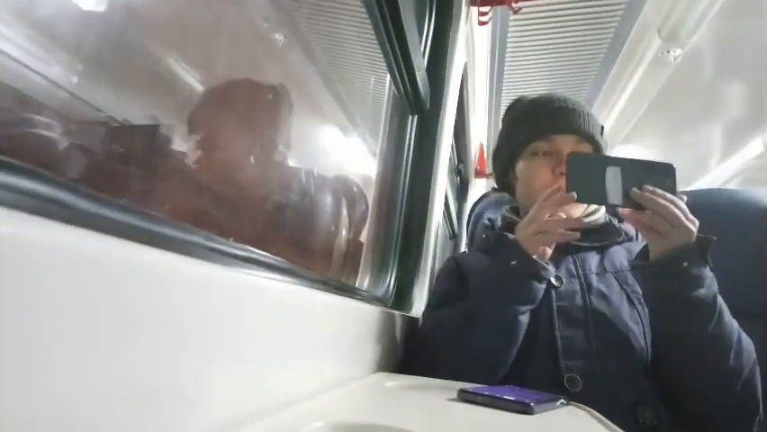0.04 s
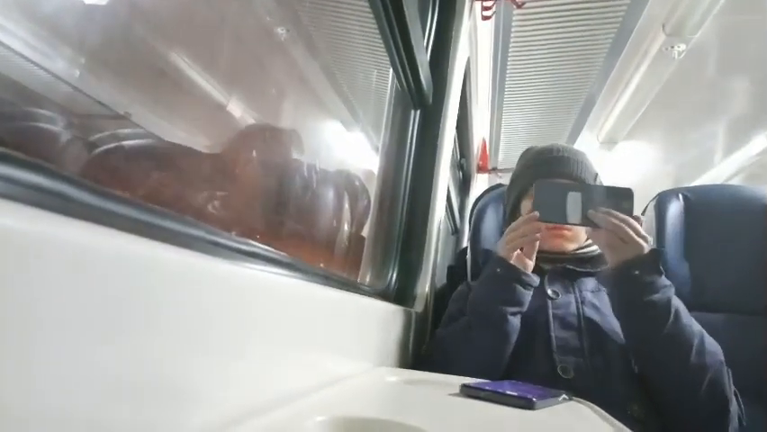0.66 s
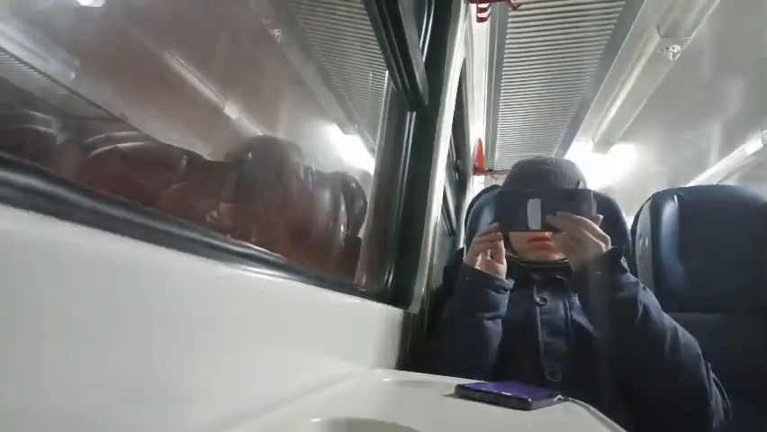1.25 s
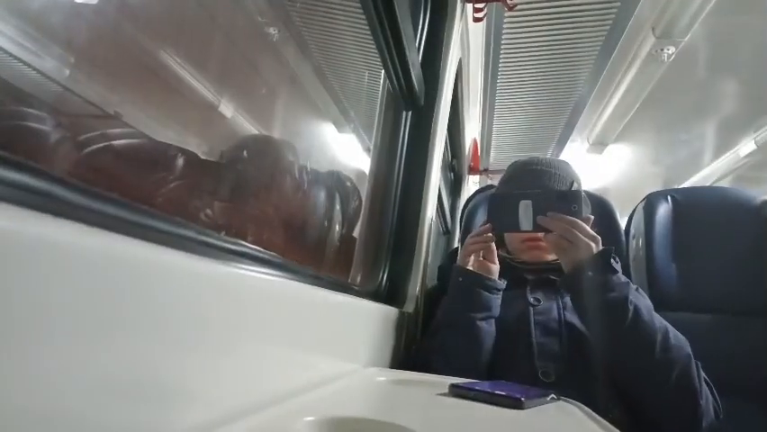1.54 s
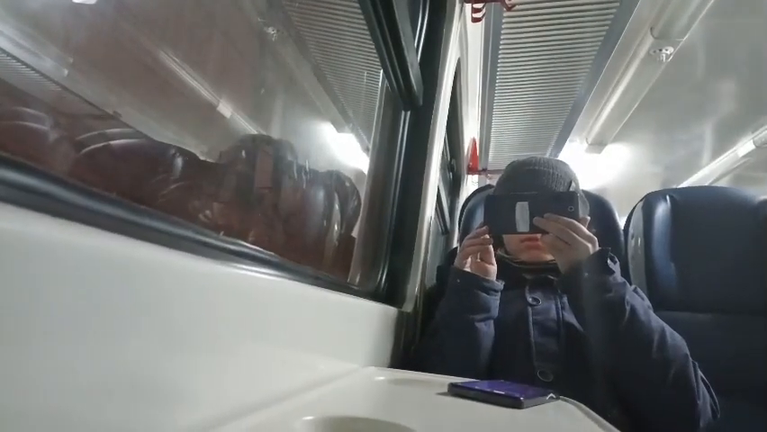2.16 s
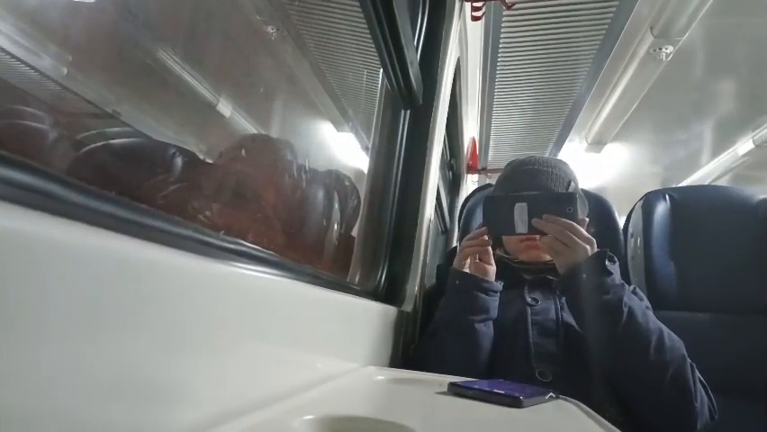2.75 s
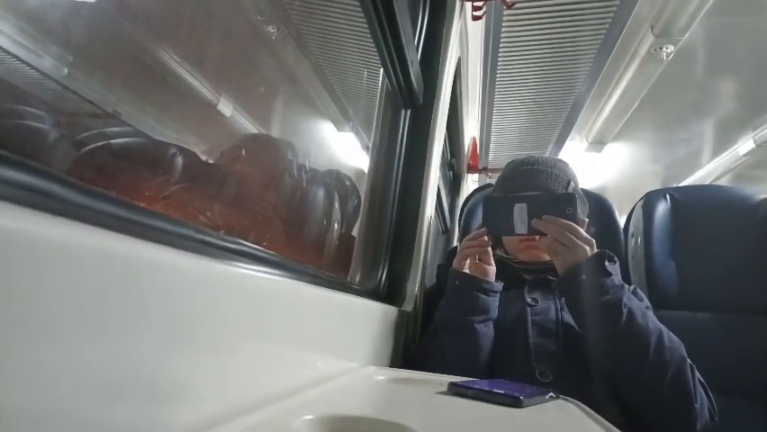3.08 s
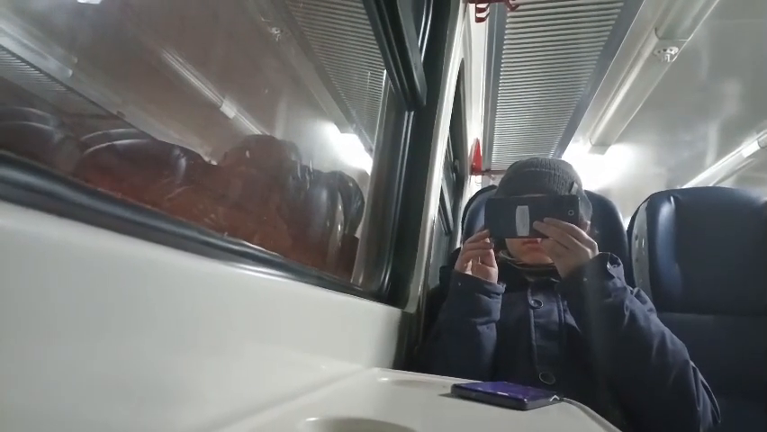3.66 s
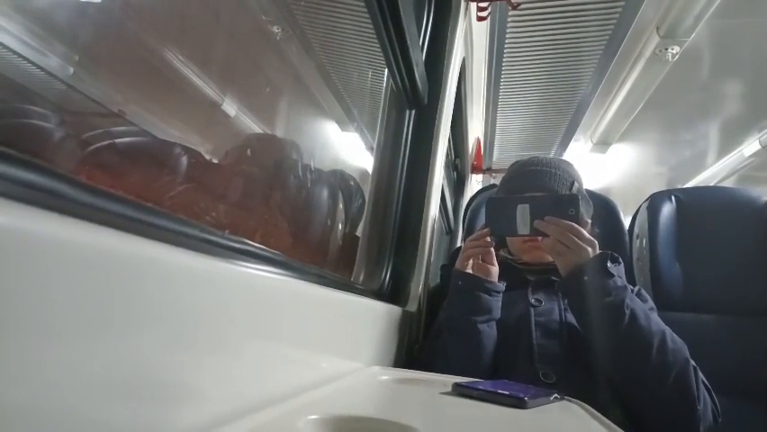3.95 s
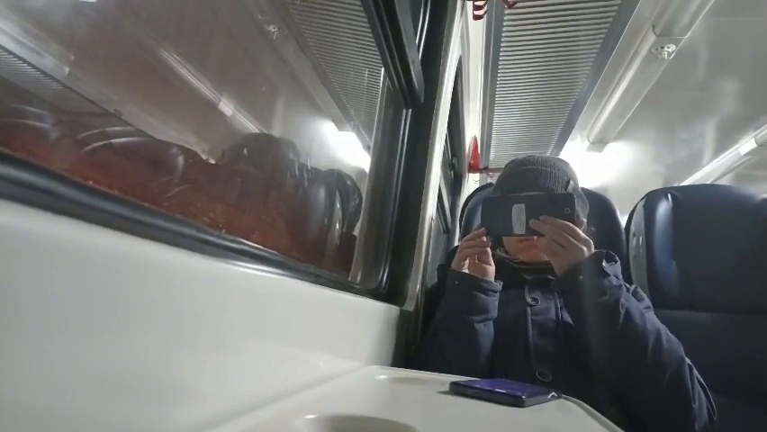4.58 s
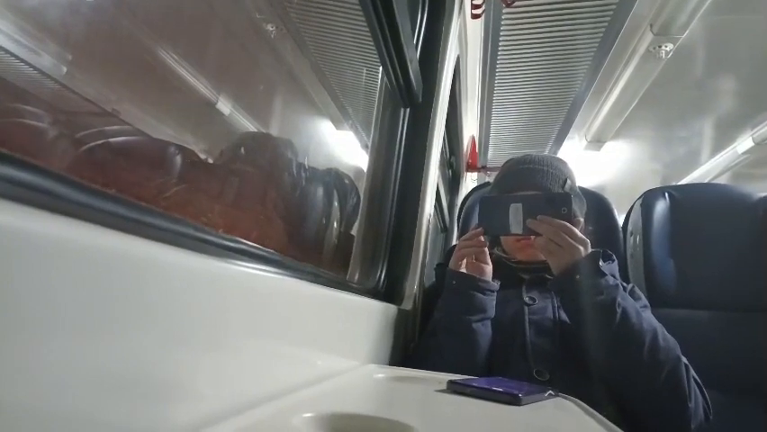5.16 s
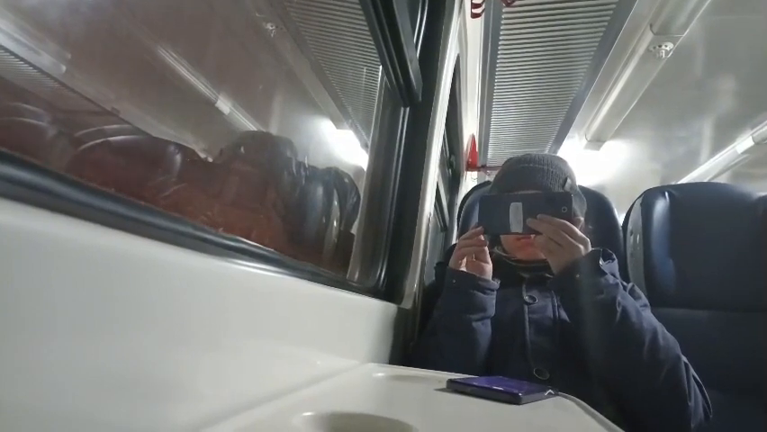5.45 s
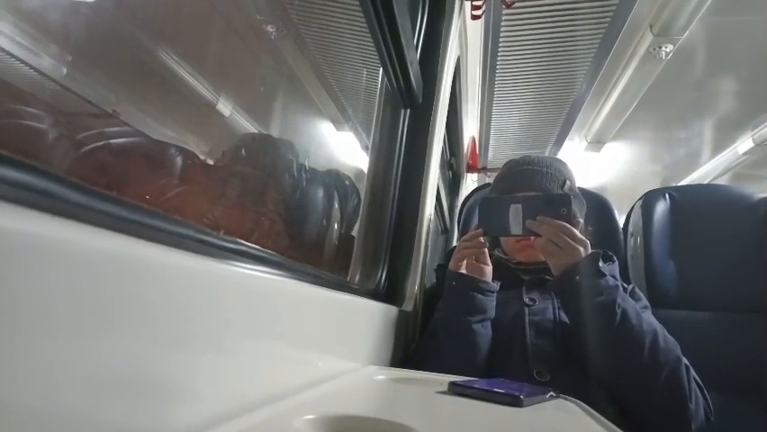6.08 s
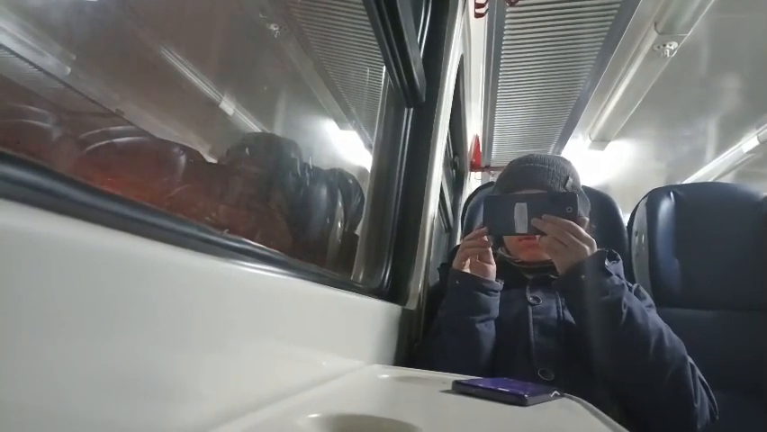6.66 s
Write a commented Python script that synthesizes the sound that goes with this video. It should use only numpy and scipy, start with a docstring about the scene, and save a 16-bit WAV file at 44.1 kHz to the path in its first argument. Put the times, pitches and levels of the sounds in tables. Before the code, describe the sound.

A moving diesel railbus rumbles from inside, with a steady whine, air hiss, and scattered thumps, knocks and metal rattles.

```python
"""Inside a moving diesel railbus. Engine and wheels force the modes of the car body into a drone,
under a rolling roar and a steady electrical whine. Jolts from the track excite free vibrations:
the floor thumps, wall panels knock and loose metal fittings rattle in the reverberant cabin.
Ventilation air hisses and resonates in its ducts, small parts tick, and a coat rustles by friction
near the microphone."""
import sys
import numpy as np
from scipy import signal
from scipy.fft import rfft, irfft, next_fast_len
from scipy.io import wavfile
from scipy.ndimage import uniform_filter1d, map_coordinates

SR = 44100
rng = np.random.default_rng(int(sys.argv[2]) if len(sys.argv) > 2 else 0)


def dump_mix(stems):
    """Bounce the given channels to the path in sys.argv[1] as a 16-bit WAV at rate SR."""
    frames = np.atleast_2d(stems).T  # one column per channel
    limited = np.clip(frames, -1, 1)  # hard clip at full scale
    pcm = np.round(limited * 32767).astype(np.int16)
    wavfile.write(sys.argv[1], SR, pcm)


N = 301203

# Coherence of the diffuse field between left and right: f/Hz, coherence
COHERENCE = [(60, 0.95), (130, 1), (290, 0.76), (640, 0.06), (1400, 0.04), (15000, .02)]
# Reverberation time of the cabin: f/Hz, T60/s
REVERBERATION = [(200, 0.56), (1000, 0.37), (2500, 0.36), (9000, 0.42)]
# Response of the microphone ports: f/Hz, left minus right/dB
PORT_BALANCE = [(60, -0.9), (200, 2), (400, 1.3), (800, -0.5), (1300, -2), (2300, -2.5), (4400, -6.5),
                (6500, -9.5), (8000, -13), (10000, -2.5), (12000, 7.5), (15000, 2)]
# Spectra of vent air, sliding cloth, fittings, panels, low rumble and rolling roar: f/Hz, level/dB
HISS_SPECTRUM = [(650, -31), (1100, -4.5), (1500, -4.5), (1770, -1.5), (2160, -6), (2330, -2.5),
                 (2570, -14), (2660, -8.5), (2940, -7.5), (4090, -15), (5690, -20.5), (8560, -29.5),
                 (12200, -26.5), (15400, -29)]
CLOTH_SPECTRUM = [(800, -21), (2000, -8), (3500, 5.5), (5000, -2), (6700, 4.5), (8000, -3.5), (10500, -3.5),
                  (11400, -5.5), (12000, 1), (15300, -11.5)]
FITTING_SPECTRUM = [(410, -14.5), (700, -1), (842, -12), (1000, -17), (1140, -5.5), (1400, -7.5),
                    (1860, -0.5), (2150, -6.5), (2430, -4), (2700, -11.5), (2950, -8), (3200, -13.5),
                    (3560, -11), (4370, -19), (5380, -23), (5840, -26), (8150, -31), (11000, -57.5),
                    (14300, -84), (22000, -120)]
PANEL_SPECTRUM = [(150, -30.5), (250, -1.5), (350, 4.5), (470, 1.5), (570, 4.5), (760, 1), (1000, -2),
                  (1250, -4), (1500, -8.5), (2200, -15.5), (3000, -24), (6000, -42.5), (15000, -69)]
RUMBLE_SPECTRUM = [(12, -53), (20, -57), (24, -38), (29, -43), (49, -22), (74, -1), (86, -16.5),
                   (102, -8.5), (125, 0.5), (173, 3.5), (195, -29), (283, -15), (330, -18.5), (430, -65),
                   (730, -120)]
ROAR_SPECTRUM = [(150, -2.5), (250, 7.5), (330, -0.5), (450, -1.5), (600, -6), (800, -10.5), (1100, -15.5),
                 (1500, -27), (2500, -39.5)]
# Air duct resonances, for each of two filter passes: f/Hz, bandwidth/Hz, level/dB
DUCT_MODES = [(1727, 28, 2), (1897, 50, -4), (2292, 46, -2), (2866, 35, -5), (3000, 27, -3),
              (3600, 130, -8.5), (3860, 53, -7.5), (4400, 34, -10)]
# Strength of the singing in the ducts: t/s, level/dB
DUCT_ENVELOPE = [(0, -66.5), (1.2, -58.5), (2.8, -63), (4, -60.5), (5.2, -61), (6.83, -60)]
# Vent whistle: f/Hz, bandwidth per filter pass/Hz, level/dB, peak t/s, half length/s
VENT_WHISTLE = (1723, 13, -57.5, -0.14, .9)
# Strokes of the sleeve: peak t/s, level/dB, rise/s, fall/s, tilt/(dB per octave)
SLEEVE_STROKES = [(.1, -65.5, .3, 1, 2), (.58, -62, 0.095, 0.17, 4), (.85, -69.5, .12, .2, 2),
                  (1.23, -65, .1, 0.53, 1), (1.67, -52.5, 0.096, 0.09, -0.5), (2.03, -74.5, 0.17, 0.5, 3),
                  (2.78, -72, .04, .07, -4), (3.28, -68, .04, 0.045, -4), (5.92, -65, .12, 0.26, -3),
                  (6.55, -64.5, 0.24, 0.36, -1)]
# Ticks of small parts: t/s, level/dB, f/Hz, bandwidth per filter pass/Hz, T60/s
PART_TICKS = [(.358, -62, 6530, 900, .3), (1.474, -57, 6200, 2500, 1), (2.03, -49.5, 3585, 70, 0.23),
              (2.322, -55, 4000, 900, 0.15), (2.91, -69, 12000, 5000, .22), (3.345, -57, 9300, 2000, .28),
              (3.35, -46, 3530, 404, .18), (5.0, -70, 6500, 3000, 0.41), (5.638, -57, 6660, 800, 0.26),
              (5.638, -62, 11400, 4500, .15), (6.061, -58, 6500, 4000, 0.31), (6.063, -65, 11000, 7000, .2),
              (6.624, -55.5, 6300, 2000, .14), (6.626, -50, 12000, 5000, 0.027)]
# Harmonics of the whine: harmonic number, level/dB, left minus right/dB
WHINE_HARMONICS = [(1, -41, 5.5), (2, -76.5, -18), (3, -70.5, 8.5), (4, -74.5, -8.5), (5, -83, -14),
                   (7, -76.5, -2), (19, -86.5, 18)]
# Harmonics that stand out for a while: harmonic number, peak t/s, swell/dB, half length/s
HARMONIC_SWELLS = [(3, 6.38, 9, 0.5), (4, 5.8, 7, 1), (19, 4.1, 3, 0.65)]
# Modes of the metal fittings: f/Hz, level/dB, T60/s
METAL_MODES = [(818, -2, .33), (854, -1, .4), (1165, -6, .35), (1644, -1, .4), (1858, 2.5, .38),
               (1925, -2, .3), (2094, 0, .42), (2242, -8, .3), (2365, -3.5, .3), (2465, -4, .33),
               (2541, -5, .38), (2822, -2, .38), (2980, -5, .24), (3057, -7.5, .42), (3435, -5, .4),
               (3483, -8, .36), (3560, -7, .28), (3790, -7, .24), (4200, -14, .26), (4620, -15, .4),
               (5103, -14, .42), (5370, -14.5, .26), (5550, -16, .28)]
# Rattles: t/s, level/dB, chatter/s, favoured f/Hz, its emphasis/dB, tilt/(dB per octave), ring/dB
FITTING_RATTLES = [(1.629, -43.5, .008, 2270, 9, -5.5, -14), (1.902, -54, 0.0093, 1790, 4, -4, -17),
                   (2.326, -51.5, 0.015, 3000, 3, -4, -15), (2.473, -42.5, 0.031, 2400, 2, -3, -9.5),
                   (2.945, -49.5, 0.014, 1800, 2, -1.5, -9), (3.327, -47, 0.039, 3600, 8, 10.5, -9),
                   (3.375, -41.5, 0.019, 2040, 0, -1.5, -9), (3.468, -45.5, .063, 1890, -7, -6, -11),
                   (3.546, -37, .014, 2270, 9, -0.5, -10), (3.566, -36.5, 0.0067, 1850, 11.5, 0.5, -10.5),
                   (3.593, -32.5, 0.0085, 1950, 5, 1, -11.5), (3.61, -42.5, .006, 1950, 8, -0.5, -11),
                   (5.44, -55.5, 0.024, 4500, 4, 12, -10), (5.467, -32.5, .02, 2830, 11, -0.5, -0.5),
                   (5.488, -35, .018, 1900, 2, 1, -8), (5.51, -34.5, 0.046, 3400, 6, -1, -4),
                   (5.584, -35, .012, 2010, 6, -1.5, -5), (5.687, -39, .015, 1590, 4, -6.5, -11.5),
                   (5.76, -32.5, .009, 1950, 7, 0.5, -4.5), (5.777, -35, 0.018, 3600, -2, 0.5, -5.5),
                   (6.42, -49, 0.038, 3500, -1, 1.5, -5), (6.711, -42, 0.032, 3360, 4, .5, -7.5)]
# Blows on wall panels: t/s, level/dB, favoured f/Hz, its emphasis/dB, tilt/(dB per octave)
PANEL_KNOCKS = [(.368, -41, 1110, 17, -1), (0.381, -35.5, 315, 16, -5), (.612, -43, 1150, 0, 1.5),
                (.625, -34.5, 308, 15, 1), (.91, -47, 1000, -1, 2), (.965, -46, 1100, 6, 2.5),
                (1.055, -41, 950, -5, -3.5), (1.335, -46, 990, 4, -0.5), (1.375, -44.5, 900, 8, -1),
                (1.54, -45.5, 820, 10, 7.5), (1.575, -35.5, 504, 10, -2), (1.624, -27, 1060, 13, -5.5),
                (1.638, -27.5, 616, 14, -5.5), (1.668, -41, 1100, 6, 1), (1.71, -37.5, 567, 11, 2),
                (1.754, -45.5, 560, 13, 3.5), (1.867, -35, 360, 27, -25), (1.904, -43.5, 1310, 12, 1),
                (2.03, -44, 1150, 3, 1.5), (2.251, -46.5, 1000, 11, -2), (2.48, -42.5, 364, 10, -3),
                (2.944, -48, 1100, 15, 0), (3.206, -42, 1150, 5, 1), (3.33, -39, 286, 22, 4),
                (3.385, -38.5, 1220, -1, 1), (3.555, -32, 815, 10, -2), (3.585, -34, 1190, 8, -1.5),
                (4.095, -54, 990, 7, 1), (4.305, -49, 1100, 8, 1), (5.232, -32, 278, 13, -4.5),
                (5.276, -49, 1050, 8, -3), (5.436, -43.5, 950, 6, -1), (5.484, -31.5, 230, 14, -2),
                (5.515, -36.5, 820, 11, -2), (5.64, -32.5, 446, 7, -10), (5.78, -40.5, 540, 6, 0.5),
                (5.915, -39.5, 360, 11, -5), (6.2, -39, 447, 9, -5.5), (6.365, -35, 446, 9, -8.5),
                (6.632, -39.5, 1170, 6, -0.5), (6.685, -33, 278, 15.5, -1), (6.7, -35.5, 1120, 11, -0.5),
                (6.72, -36, 454, 19, -0.5)]
# Thumps of floor and walls: t/s, peak level/dB, f/Hz
JOLT_THUMPS = [(0.609, -29, 155.5), (1.599, -25, 128), (1.622, -27, 204.5), (1.628, -25, 620.6),
               (1.672, -22.5, 189.3), (1.68, -43, 570), (3.332, -23.5, 194), (3.352, -27, 126),
               (3.383, -17.5, 127), (3.424, -29, 135), (3.507, -24, 129.6), (3.545, -22.5, 135),
               (3.6, -24.5, 202), (3.64, -21, 130), (5.473, -18.5, 139), (5.478, -21, 195.5),
               (5.622, -14, 135), (5.653, -15.5, 139), (6.684, -23.5, 180)]
# Booming modes of the car body: f/Hz, bandwidth/Hz, level/dB
BODY_MODES = [(54.3, 19, -12), (88.7, 6, 1.5), (123, 28, -6), (135, 9, -1), (169, 4.3, 1),
              (203.1, 5.2, -4.5), (230, 56, -15)]
# Roughness of the track: t/s, level/dB
TRACK_ROUGHNESS = [(0, 2.5), (.8, 3.5), (1.5, 2.5), (2.2, 1), (2.7, -0.5), (3.9, 0.1), (5, -2), (5.8, 3),
                   (6.83, -0.5)]
# Bumps in the track: peak t/s, swell/dB
TRACK_BUMPS = [(.22, 3), (.62, 3.5), (.78, 1.5), (1.42, 3.5), (1.61, 4), (1.96, 1), (2.87, 1), (3.4, 7),
               (3.58, 8), (3.95, 0), (4.11, 1), (4.3, 2), (4.65, 0.5), (5.5, 4.5), (5.65, 3.5), (6.7, 1.5)]

# Level on average track, and growth in dB per dB of roughness
HISS_DB, HISS_GROWTH = -57.5, 0.92
ROAR_DB, ROAR_GROWTH = -45.5, 0.71
DRONE_DB, DRONE_GROWTH = -31.5, 0.39
BUMP_RISE_S, BUMP_FALL_S, BUMP_ROAR_SHARE = 0.074, 0.1, 0.37
WHINE_HZ, WHINE_CREEP_HZ_PER_S = 628.7, 0.41
AISLE_LAG_SAMPLES = 18  # sound from the aisle reaches the left port after the right
BAND_LIMIT_HZ = 15500


def amp(db):
    """Amplitude ratio of a level in decibels."""
    return 10 ** (np.asarray(db) / 20)


def unit(x):
    """Normalisation to rms 1."""
    return x / np.sqrt(np.mean(x ** 2) + 1e-20)


def even(x, seconds):
    """Division by the running rms holds a noise at steady strength."""
    power = uniform_filter1d(np.mean(x ** 2, axis=0), int(seconds * SR))
    return x / np.sqrt(np.abs(power) + 1e-9)


def along(points, hz):
    """Interpolation of (f/Hz, value) points on a logarithmic frequency axis."""
    f, v = np.transpose(points)
    return np.interp(np.log(hz + 1), np.log(f + 1), v)


def curve(rows):
    """Linear interpolation of (t/s, value) rows at every sample."""
    s, v = np.transpose(rows)
    return np.interp(np.arange(N) / SR, s, v)


def wobble(rate):
    """Smooth random modulation: a spline through rate knots a second."""
    knots = rng.standard_normal(int(N * rate / SR) + 4)
    return map_coordinates(knots, [np.arange(N) * rate / SR])


def swell(s, rise, fall):
    """Two-sided Gaussian envelope of height 1, peaking at time s."""
    t = np.arange(N) / SR - s
    return np.exp(-(t / np.where(t < 0, rise, fall)) ** 2)


def add(out, s, sound):
    """Superposition of a sound from time s onward."""
    start = max(round(s * SR), 0)
    span = out[:, start:start + sound.shape[-1]]
    span += sound[..., :span.shape[-1]]


def filtered(x, response):
    """Linear filtering: the spectrum is multiplied by a frequency response."""
    n = x.shape[-1]
    padded = next_fast_len(n + SR // 5)
    hz = np.fft.rfftfreq(padded, 1 / SR)
    return irfft(rfft(x, padded) * response(hz), padded)[..., :n]


def resonances(modes, hz):
    """Gain of damped resonators (f/Hz, bandwidth/Hz, level/dB) whose powers add."""
    return np.sqrt(sum(np.abs(amp(db) * hz * width / (f * f - hz * hz + 1j * hz * width)) ** 2
                       for f, width, db in modes))


def minimum_phase(gain, size):
    """Causal impulse response of a given gain, by folding the cepstrum onto positive time."""
    hz = np.fft.rfftfreq(size, 1 / SR)
    cepstrum = irfft(np.log(np.maximum(gain(hz), 1e-6)), size)
    cepstrum[1:size // 2] *= 2
    cepstrum[size // 2 + 1:] = 0
    return irfft(np.exp(rfft(cepstrum)), size)


def diffuse(colour, size=N):
    """Diffuse noise field of rms 1: coherent between the ports in the bass, incoherent in the treble."""
    def mid_side_gain(hz):
        angle = np.arccos(np.clip(along(COHERENCE, hz), -1, 1)) / 2
        return colour(hz) * np.array([np.cos(angle), np.sin(angle)])
    mid, side = filtered(rng.standard_normal((2, size)), mid_side_gain)
    return unit(np.array([mid + side, mid - side]))


def aisle_noise(colour, direct_share):
    """Power from the aisle divides between a direct wave, earlier on the right, and a diffuse field."""
    source = diffuse(colour)[0]
    direct = np.array([np.roll(source, AISLE_LAG_SAMPLES), source])
    return np.sqrt(direct_share) * direct + np.sqrt(1 - direct_share) * diffuse(colour)


def cabin_impulse(direct_db, size=2 ** 14):
    """Impulse response from the aisle: direct sound, then echoes decaying at each band's own rate."""
    hz, t, bands = signal.stft(diffuse(np.ones_like, size), SR, nperseg=256)
    decay = amp(-60 * t / along(REVERBERATION, hz)[:, None])
    sound = signal.istft(bands * decay, SR, nperseg=256)[1][:, :size]
    sound[[0, 1], [AISLE_LAG_SAMPLES, 0]] += amp(direct_db)
    return sound


def struck_object(blows, spectrum, pitch, tilt_db, emphasis_db, relative_width):
    """Impact response: each contact favours one resonance and has its own brightness."""
    def gain(hz):
        favoured = np.hypot(1, resonances([(pitch, relative_width * pitch, emphasis_db)], hz))
        tilt = amp(tilt_db * np.log2(np.clip(hz, 250, 7000) / 1000))
        return amp(along(spectrum, hz)) * favoured * tilt
    ring = minimum_phase(gain, size=2 ** 14)
    return signal.fftconvolve(blows, ring[None] / np.linalg.norm(ring), axes=1)


def ventilation():
    """Flow noise: a hiss that follows the running noise, duct resonances and a thin, fading whistle."""
    hiss = aisle_noise(lambda hz: amp(along(HISS_SPECTRUM, hz)), direct_share=0.061)
    ducts = even(aisle_noise(lambda hz: resonances(DUCT_MODES, hz) ** 2, direct_share=0.12), seconds=0.2)
    pitch, width, db, s, half = VENT_WHISTLE
    whistle = even(diffuse(lambda hz: resonances([(pitch, width, 0)], hz) ** 2), seconds=0.1)
    hiss_db = HISS_DB + HISS_GROWTH * curve(TRACK_ROUGHNESS) + 0.71 * wobble(7)
    duct_db = curve(DUCT_ENVELOPE) + 1.6 * wobble(2.55)
    return amp(hiss_db) * hiss + amp(duct_db) * ducts + amp(db) * swell(s, half, half) * whistle


def coat(grain_db=2):
    """Sliding friction: each stroke of the sleeve swells and fades in fine, uneven slips."""
    out = np.zeros((2, N))
    octaves = lambda hz: np.log2(np.maximum(hz, 3000) / 8000)
    for s, db, rise, fall, tilt_db in SLEEVE_STROKES:
        cloth = diffuse(lambda hz: amp(along(CLOTH_SPECTRUM, hz) + tilt_db * octaves(hz)))
        out += amp(db) * swell(s, rise, fall) * cloth
    slips = unit(amp(grain_db * wobble(250)))
    return out * slips


def ticks(attack_s=0.0027):
    """Damped resonance: small hard parts ring briefly in a band of noise around one pitch."""
    out, t = np.zeros((2, N)), np.arange(SR // 3) / SR
    for s, db, pitch, width, t60 in PART_TICKS:
        ring = diffuse(lambda hz: resonances([(pitch, width, 0)], hz) ** 2, size=len(t))
        envelope = amp(db - 60 * t / t60) * (1 - np.exp(-t / attack_s))
        add(out, s, envelope * ring)
    return out


def electrical_whine():
    """Harmonic series: a clean electrical tone with faint overtones creeps slowly upward."""
    pitch = WHINE_HZ + WHINE_CREEP_HZ_PER_S * np.arange(N) / SR + 0.44 * wobble(6.8)
    phase = 2 * np.pi * np.cumsum(pitch) / SR + np.array([[0.1], [-0.1]])  # left, right
    out = np.zeros((2, N))
    for harmonic, db, pan_db in WHINE_HARMONICS:
        waver_db = 0.3 if harmonic == 1 else 1.5  # short waves shift more as the carriage sways
        swell_db = sum(up_db * swell(s, half, half)
                       for number, s, up_db, half in HARMONIC_SWELLS if number == harmonic)
        level = amp(db + swell_db + waver_db * wobble(8.3))
        pan = amp([[pan_db / 2], [-pan_db / 2]])
        out += level * pan * np.sin(harmonic * phase)
    return out


def metal_ring(attack_s, pitch, scatter_db=1.5, fall_db_per_octave=5.5):
    """Modal vibration: a fitting's modes build up, most near the favoured pitch, and decay freely."""
    t, out = np.arange(SR // 2) / SR, 0
    for hz, db, t60 in METAL_MODES:
        octaves_away = abs(np.log2(hz / pitch))
        port_db = db - fall_db_per_octave * octaves_away + scatter_db * rng.standard_normal((2, 1))
        mode = np.sin(2 * np.pi * (hz * t + rng.random((2, 1))))
        out = out + amp(port_db - 60 * t / t60) * mode
    return out * (1 - np.exp(-t / attack_s))


def rattles(count=5, scatter_db=2, first_db=-5):
    """Repeated impact: a loose fitting touches lightly, strikes in uneven succession and rings on."""
    out = np.zeros((2, N))
    chances = rng.uniform(-1, 1, (len(FITTING_RATTLES), count, 2))
    for (s, db, length, pitch, emphasis_db, tilt_db, ring_db), chance in zip(FITTING_RATTLES, chances):
        blows = np.zeros((2, SR // 2))
        for k, (late, strength) in enumerate(chance):
            force = amp(scatter_db * strength + first_db * (k == 0))
            onset = length * (k + 0.4 * late * (k > 0)) / count
            add(blows, onset, force * cabin_impulse(direct_db=23))
        chatter = struck_object(blows, FITTING_SPECTRUM, pitch, tilt_db, emphasis_db, relative_width=0.33)
        add(out, s, amp(db - 4.5) * chatter)
        add(out, s, amp(db + ring_db) * metal_ring(length / 2, pitch))
    return out


def knocks():
    """Impulse excitation: a single blow sets a wall panel ringing dully."""
    out = np.zeros((2, N))
    for s, db, pitch, emphasis_db, tilt_db in PANEL_KNOCKS:
        blow = cabin_impulse(direct_db=24.5)
        knock = struck_object(blow, PANEL_SPECTRUM, pitch, tilt_db, emphasis_db, relative_width=0.078)
        add(out, s, amp(db) * knock)
    return out


def thumps(rise_s=0.016):
    """Transient response: each jolt swells and fades in one hollow mode of the floor or wall."""
    out, t = np.zeros((2, N)), np.arange(SR // 4) / SR
    envelope = (t / rise_s * np.exp(1 - t / rise_s)) ** 2
    for s, db, hz in JOLT_THUMPS:
        add(out, s, amp(db) * envelope * np.sin(2 * np.pi * hz * t))
    return out


def running_noise():
    """Forced vibration: engine and wheels drive the body's modes and a roar, louder on rough track."""
    boom_band = lambda hz: hz ** 4 / (hz ** 4 + 40 ** 4) / np.sqrt(1 + (hz / 260) ** 8)
    roar_band = lambda hz: hz ** 2 / (hz ** 2 + 100 ** 2) / (1 + (hz / 3000) ** 4)
    boom = diffuse(lambda hz: resonances(BODY_MODES, hz) * boom_band(hz))
    rumble = diffuse(lambda hz: amp(along(RUMBLE_SPECTRUM, hz)))
    roar = diffuse(lambda hz: amp(along(ROAR_SPECTRUM, hz)) * roar_band(hz))
    drone = even(boom + amp(-6) * rumble, seconds=0.13)
    track_db = curve(TRACK_ROUGHNESS)
    bump_db = sum(db * swell(s, BUMP_RISE_S, BUMP_FALL_S) for s, db in TRACK_BUMPS)
    drone_db = DRONE_DB + DRONE_GROWTH * track_db + bump_db + 1.12 * wobble(14)
    roar_db = ROAR_DB + ROAR_GROWTH * track_db + BUMP_ROAR_SHARE * bump_db + 1.54 * wobble(5.8)
    return amp(drone_db) * drone + amp(roar_db) * roar


def scene():
    """Superposition: each microphone port colours the cabin's sound in its own way; the whine is added."""
    cabin = running_noise() + ventilation() + thumps() + knocks() + rattles() + ticks() + coat()
    port_gains = lambda hz: amp(np.outer([0.5, -0.5], along(PORT_BALANCE, hz)))
    return electrical_whine() + filtered(cabin, port_gains)


def record(dry):
    """Ideal low-pass filtering: nothing passes above the band limit."""
    return filtered(dry, lambda hz: hz < BAND_LIMIT_HZ)


dry = scene()
out = record(dry)
dump_mix(out)
```